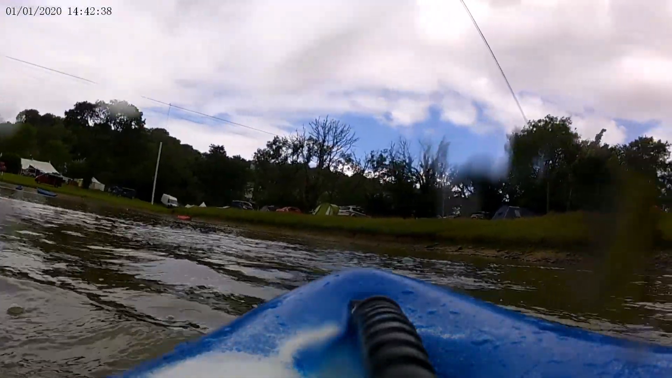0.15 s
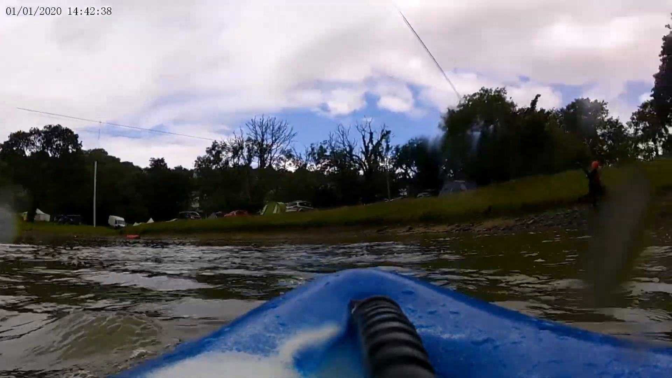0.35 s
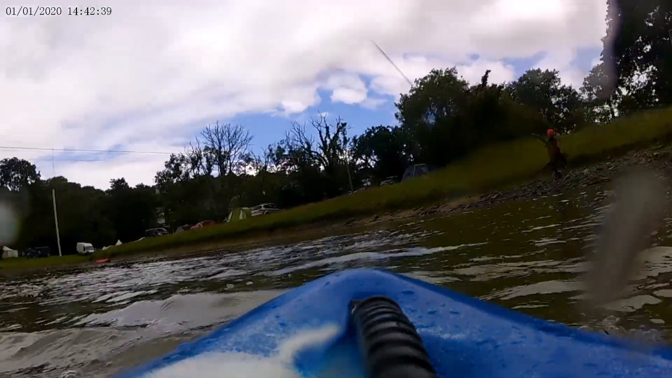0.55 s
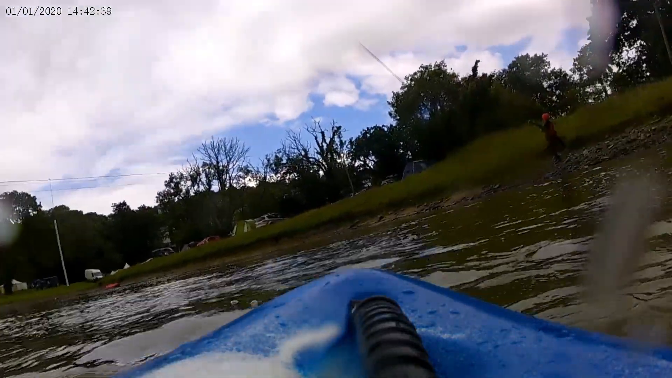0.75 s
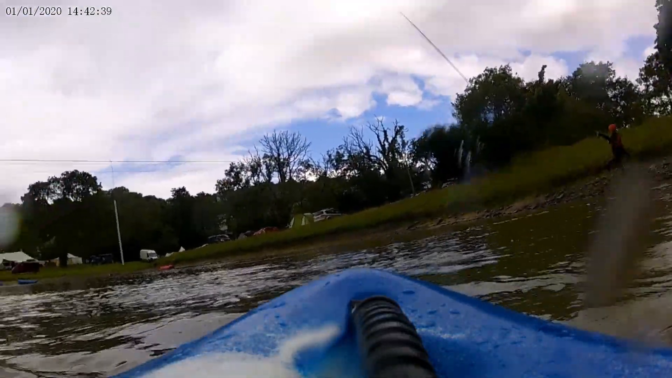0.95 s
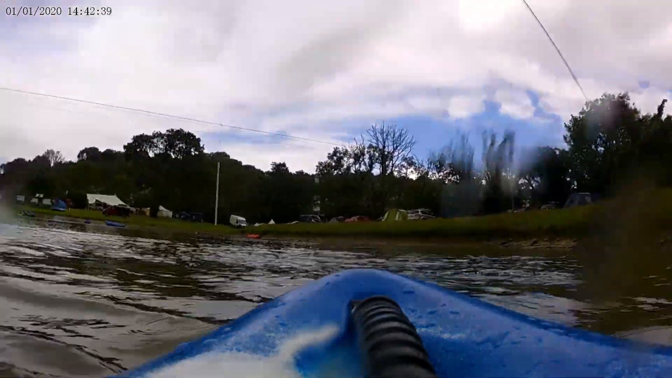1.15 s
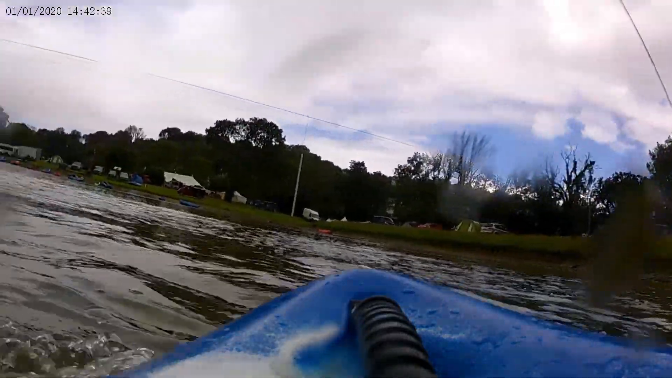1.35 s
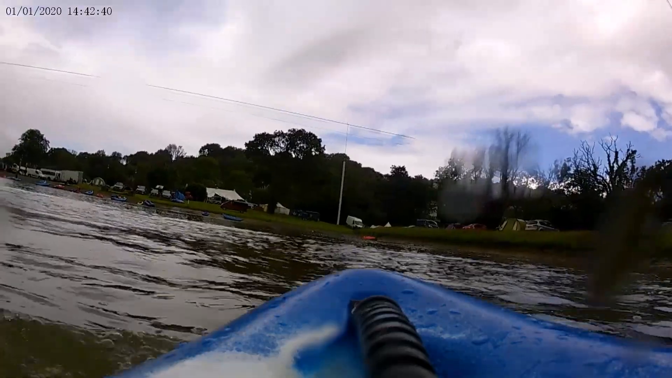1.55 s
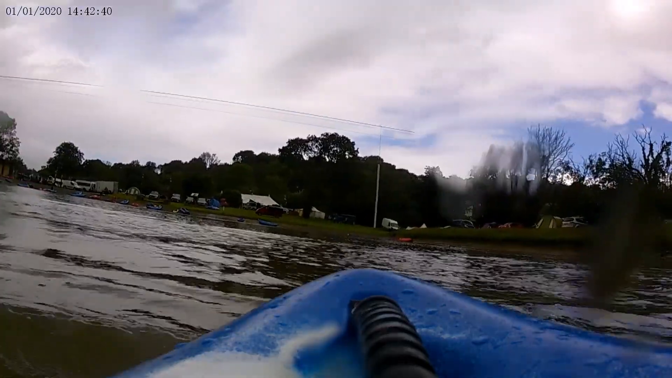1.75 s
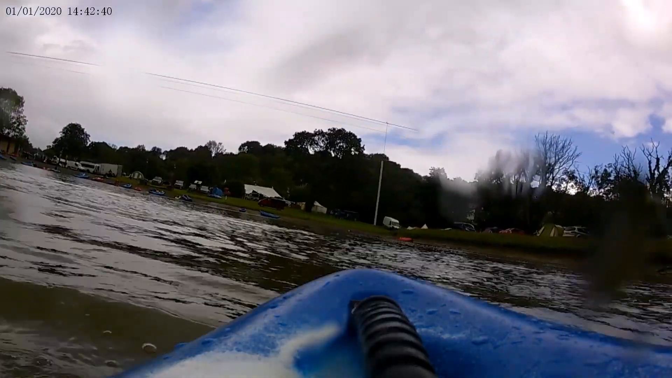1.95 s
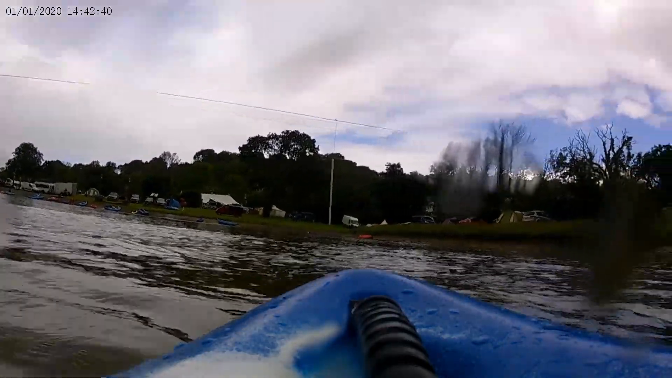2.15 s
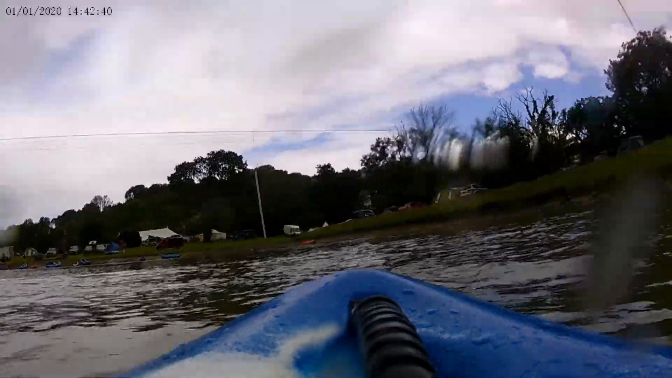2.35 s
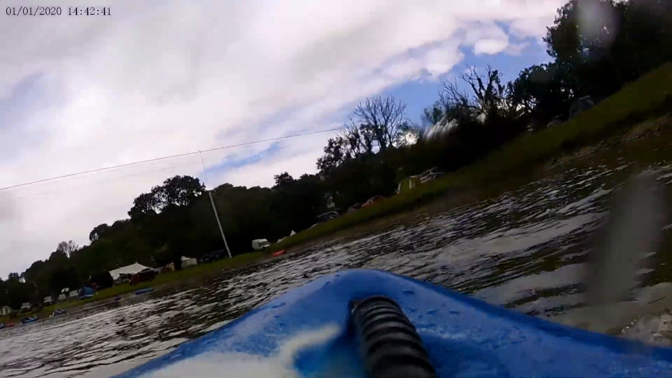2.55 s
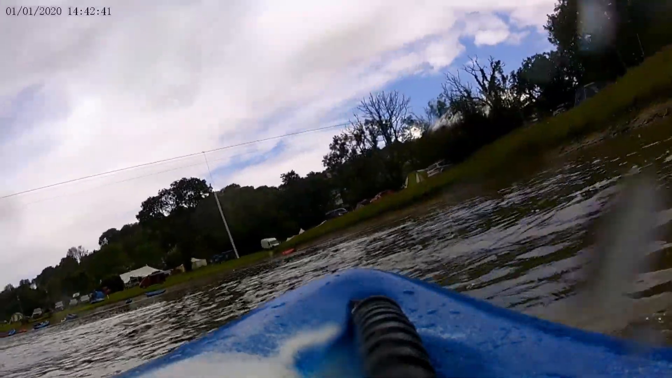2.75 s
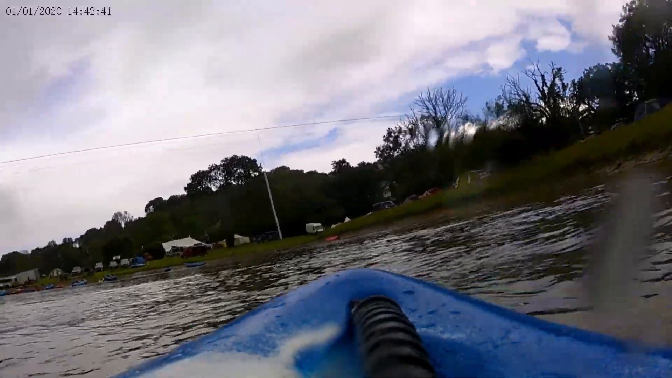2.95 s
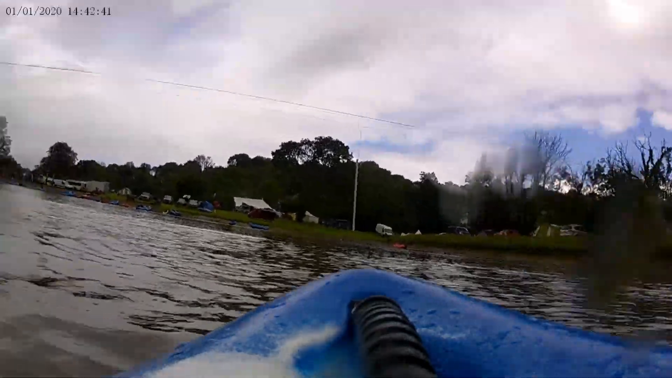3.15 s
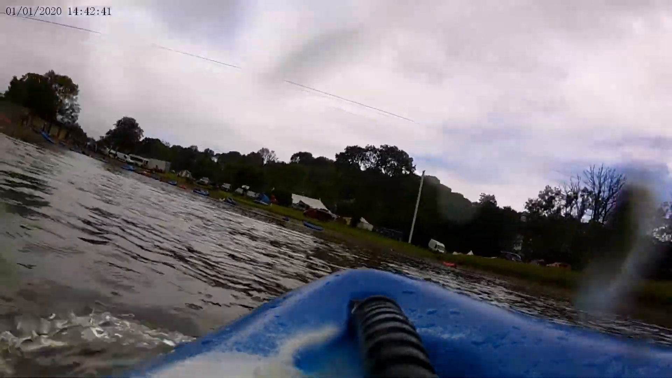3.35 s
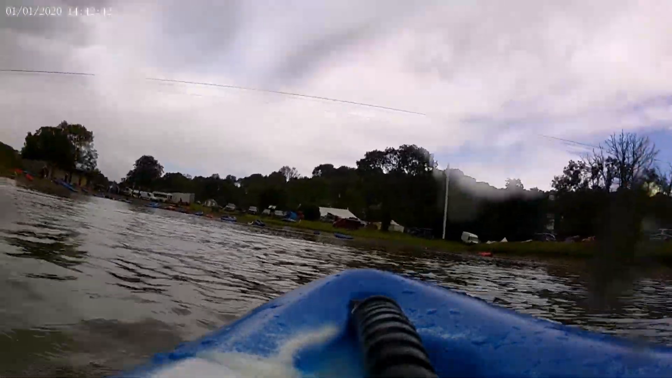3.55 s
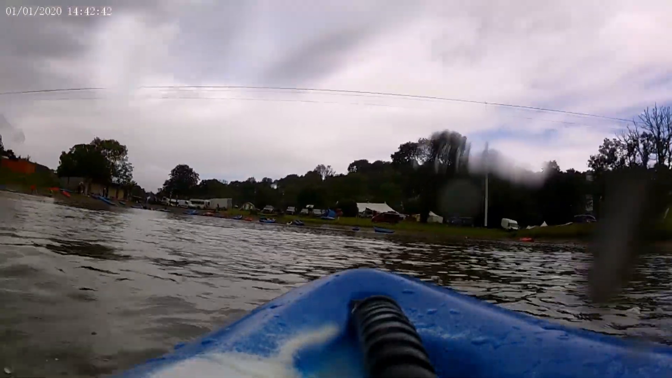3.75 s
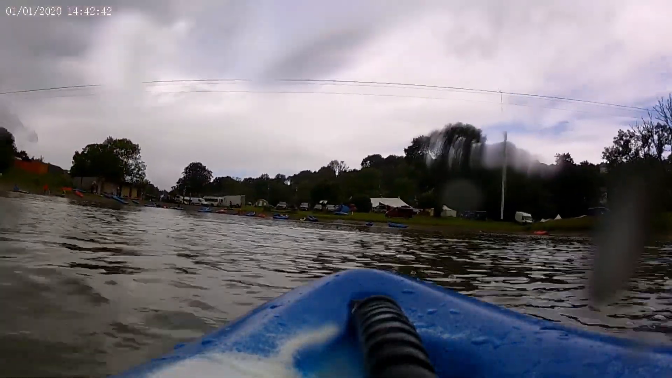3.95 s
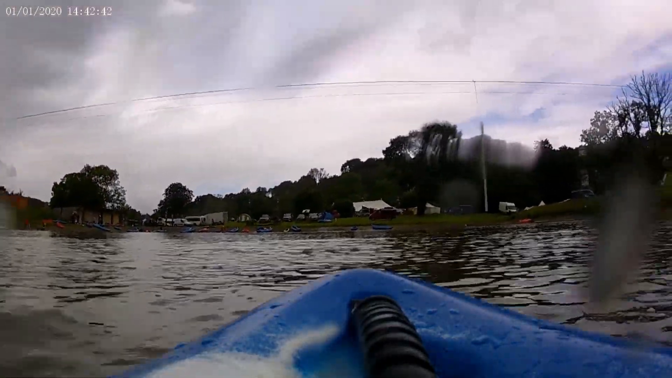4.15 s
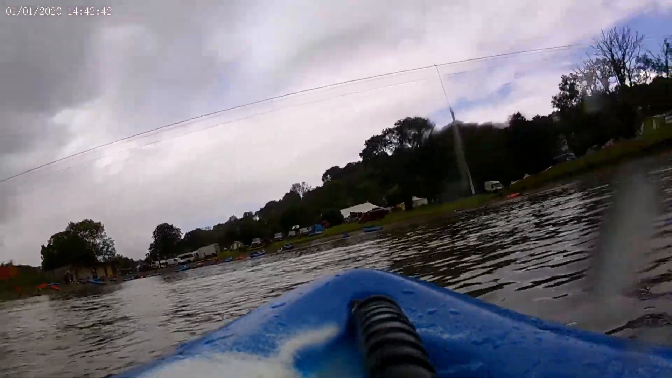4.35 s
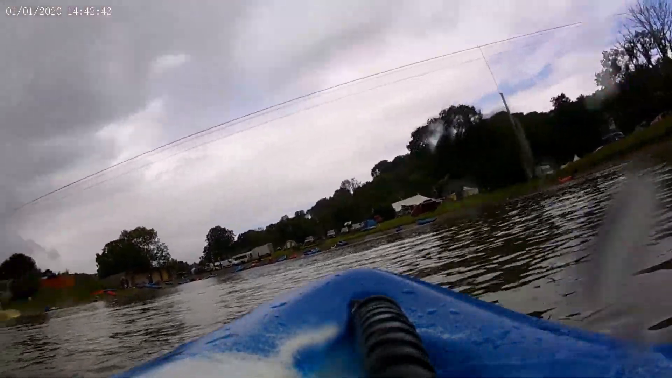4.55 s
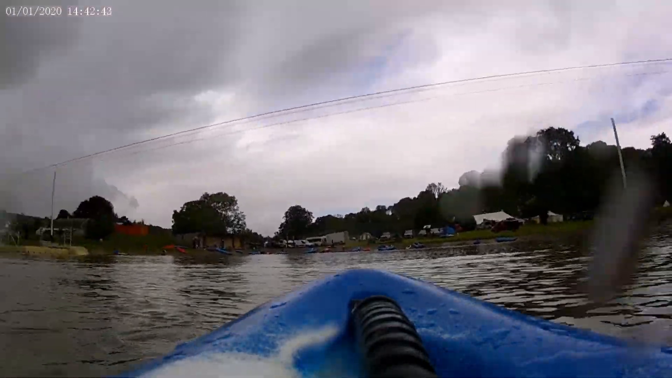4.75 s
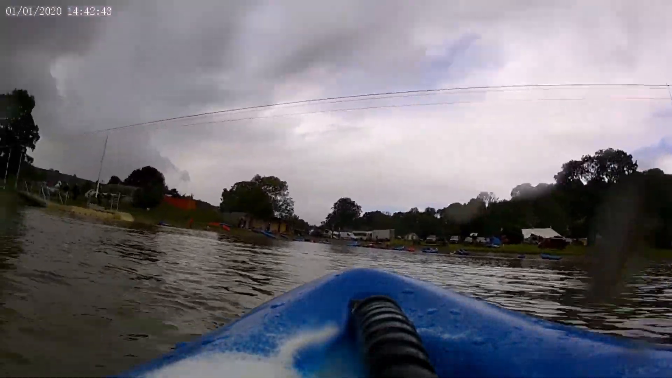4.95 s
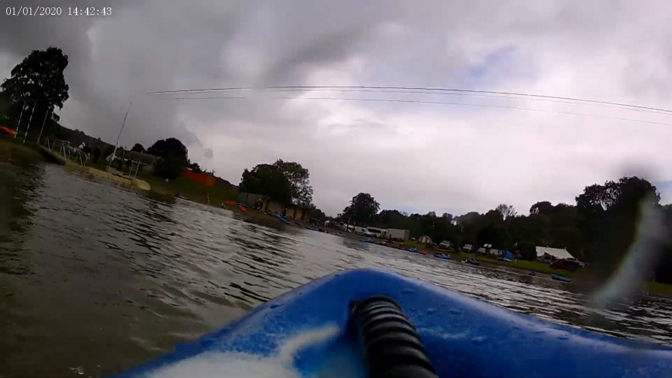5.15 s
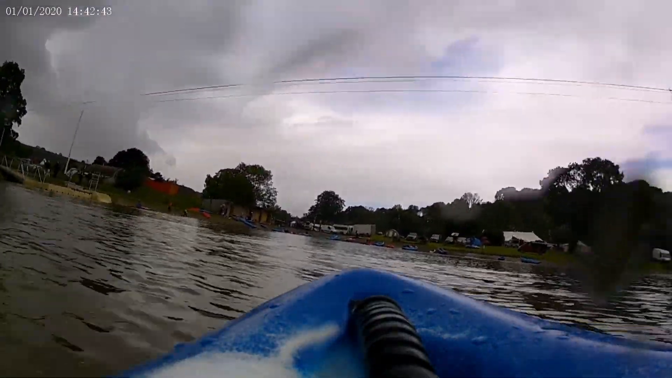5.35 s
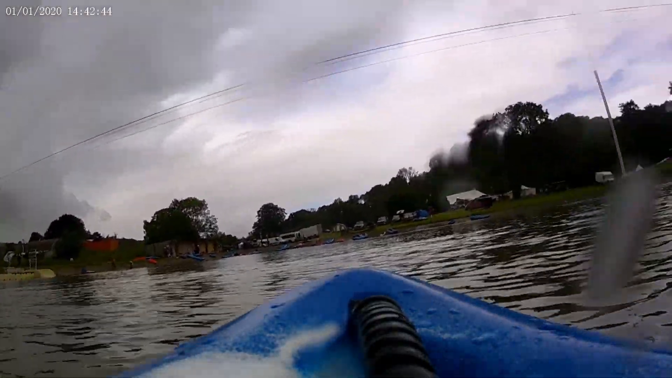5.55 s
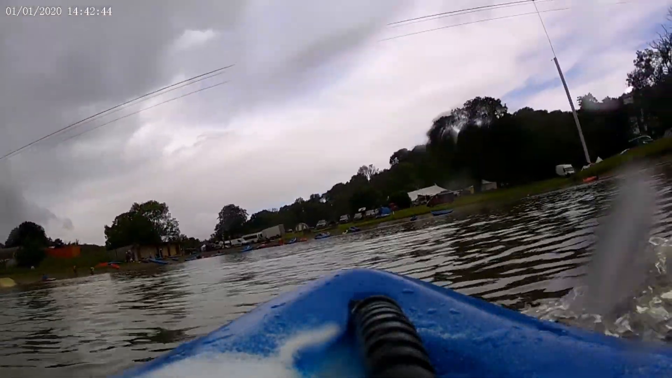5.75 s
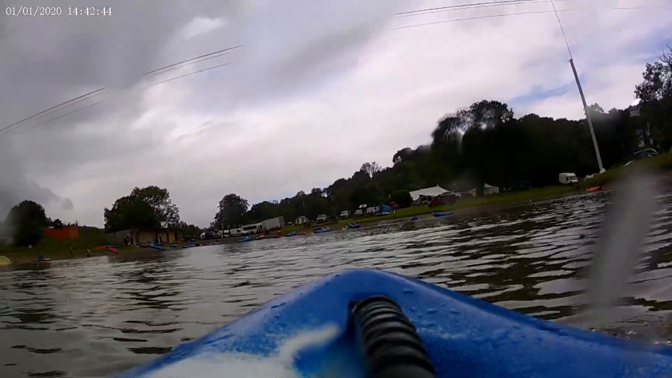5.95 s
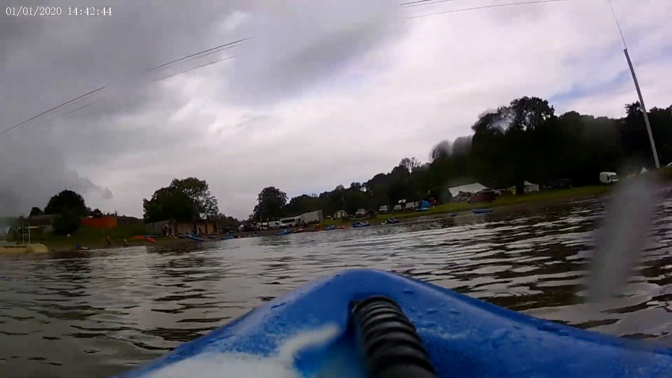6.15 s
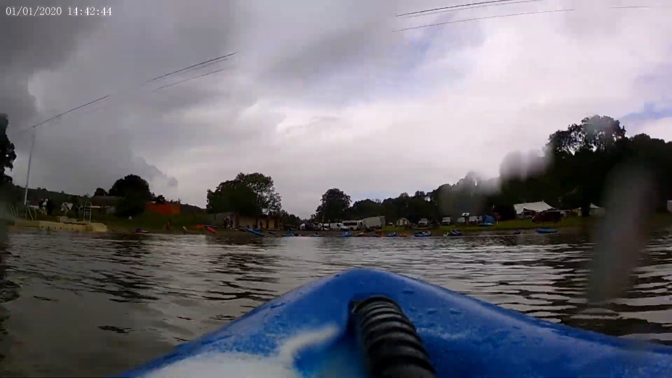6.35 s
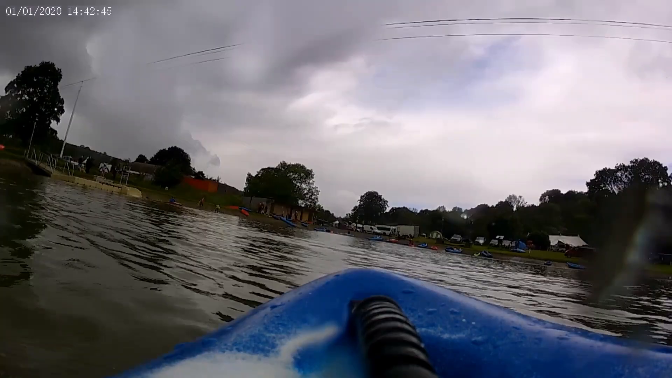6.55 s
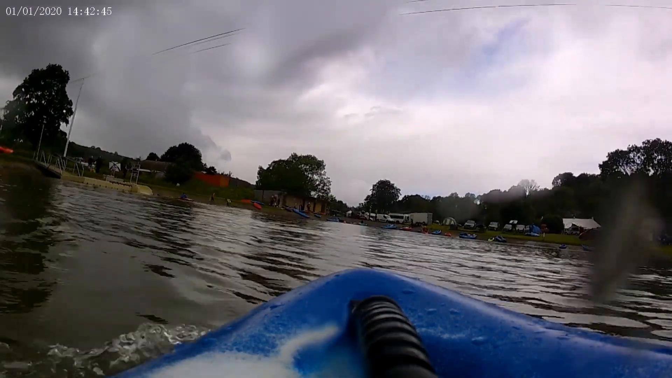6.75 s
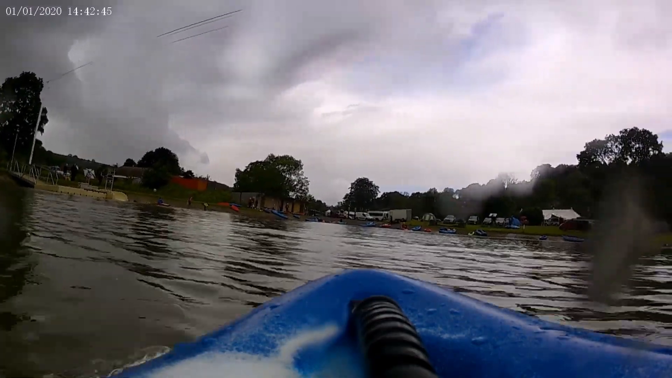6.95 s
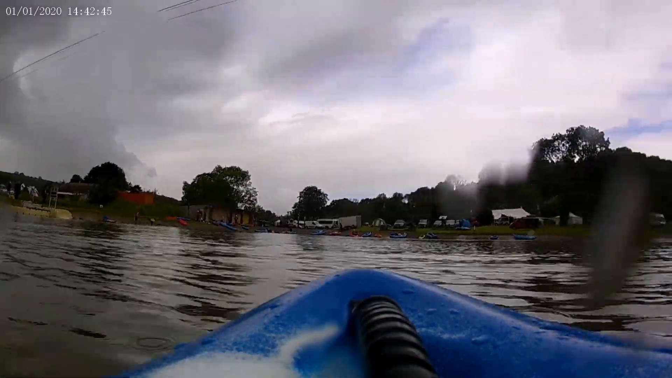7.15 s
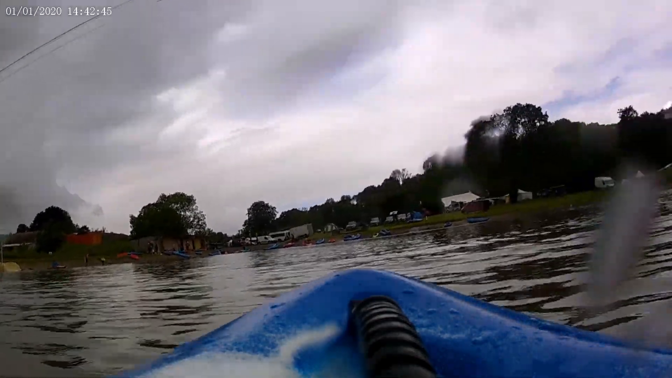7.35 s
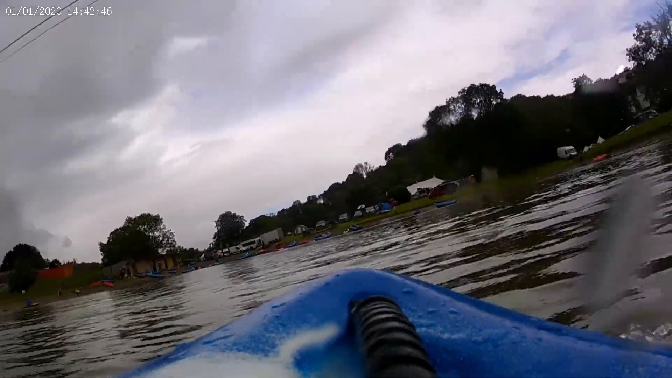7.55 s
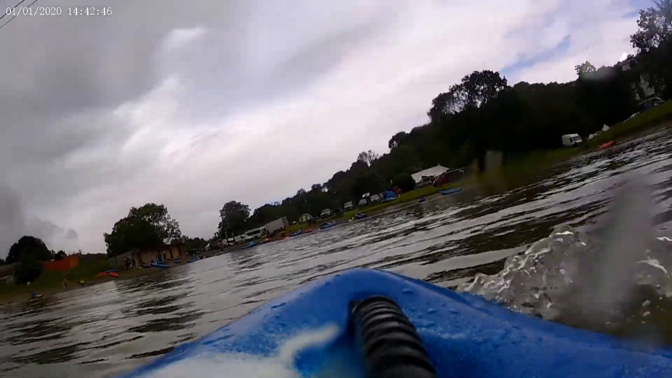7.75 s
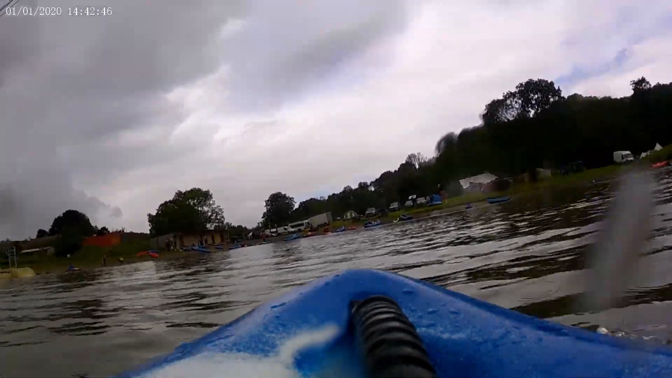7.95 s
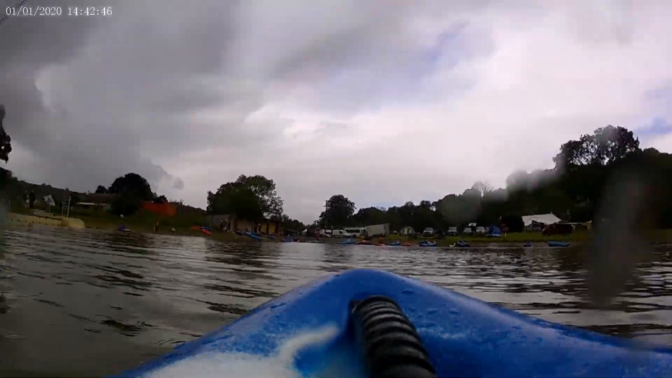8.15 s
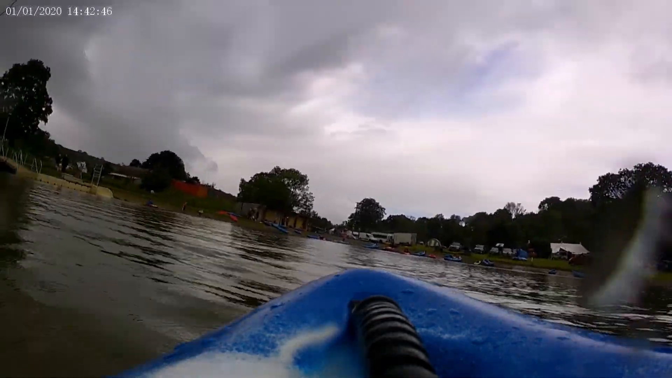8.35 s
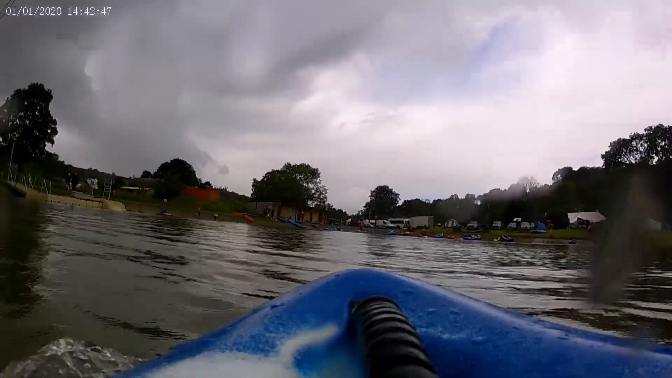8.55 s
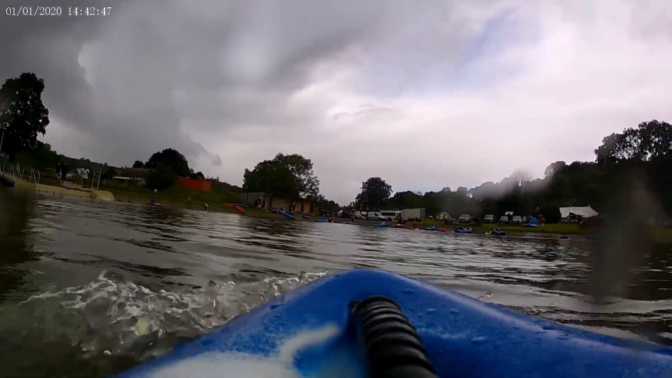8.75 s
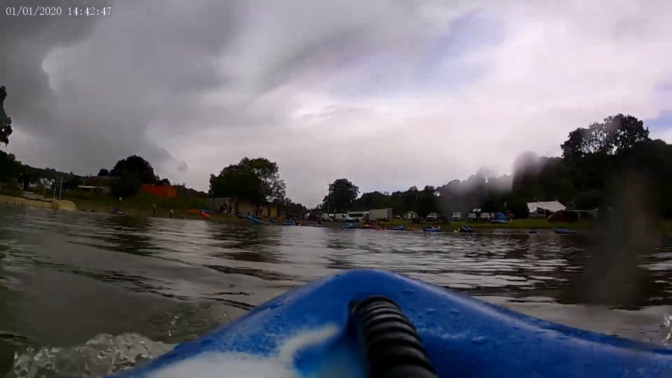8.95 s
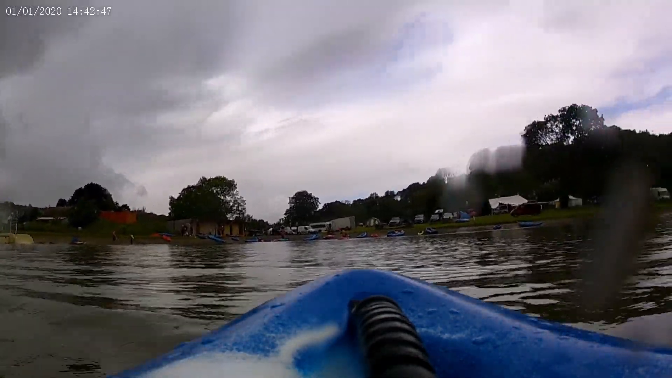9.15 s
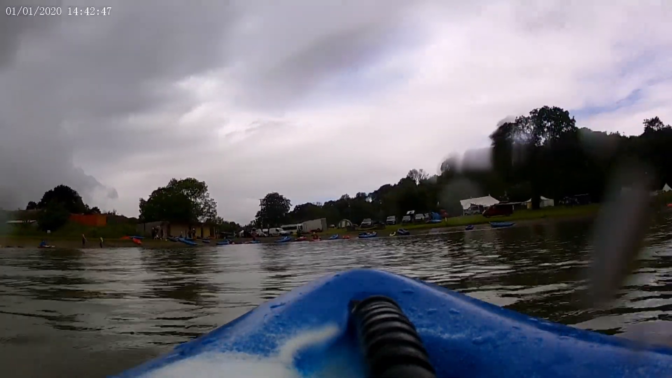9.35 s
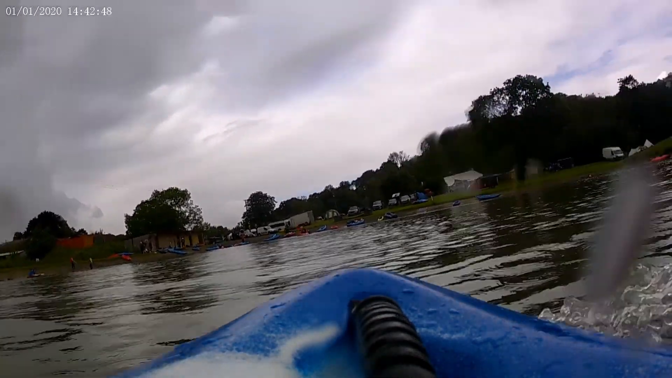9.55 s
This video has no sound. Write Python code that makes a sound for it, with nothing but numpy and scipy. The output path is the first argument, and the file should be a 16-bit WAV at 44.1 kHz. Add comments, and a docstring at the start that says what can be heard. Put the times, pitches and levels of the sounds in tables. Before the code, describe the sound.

Heard from a sealed case fixed to a plastic kayak's deck, water gurgles, sloshes and plops along the hull on open water. Small waves slap softly and drops tick. A hard paddle knock at about 3.5 seconds distorts and booms through the hollow hull. Later the gurgling grows in strong surges, with more knocks and brief wet scraping. Faint hiss stays underneath.

```python
"""A plastic kayak is paddled over a lake, heard from a sealed case fixed to its deck.
From the start, swarms of short bubble tones and wandering noise gurgle, slosh and spray along the hull.
Single bubbles plop, wavelets slap and fine drops tick: short dying tones, some with puffs of noise.
From 3.5 s the paddle knocks the rim: noise bursts ring the case and panels, overload the input, and the
hollow hull booms. The shaft drags in wet chatter at 6.6 s and 8.4 s. A faint hiss lies under it all."""
import sys
import numpy as np
from scipy import signal
from scipy.fft import rfft, irfft
from scipy.io import wavfile
from scipy.ndimage import uniform_filter1d

SR = 44100
rng = np.random.default_rng(int(sys.argv[2]) if len(sys.argv) > 2 else 0)


def dump_mix(stems):
    """Bounce the given channels to the path in sys.argv[1] as a 16-bit WAV at rate SR."""
    frames = np.atleast_2d(stems).T  # one column per channel
    limited = np.clip(frames, -1, 1)  # hard clip at full scale
    pcm = np.round(limited * 32767).astype(np.int16)
    wavfile.write(sys.argv[1], SR, pcm)


N = 423346
T = np.arange(N) / SR


def amp(db):
    """Turns decibels into a plain gain."""
    return 10 ** (np.asarray(db) / 20)


def evened(x):
    """Scales x to an average (RMS) level of 1."""
    return x / np.sqrt(np.mean(x ** 2) + 1e-20)


def add(mix, start_s, sound):
    """Adds a sound to the mix in place, cut off at the end."""
    part = mix[round(start_s * SR):][:len(sound)]
    part += sound[:len(part)]


def lowpass(x, order, cutoff_hz):
    """Dulls x above the cutoff."""
    return signal.lfilter(*signal.butter(order, cutoff_hz, fs=SR), x)


def bandpass(x, order, low_hz, high_hz):
    """Keeps the pitches between two limits."""
    return signal.sosfilt(signal.butter(order, [low_hz, high_hz], "band", fs=SR, output="sos"), x)


def shaped(x, spectrum):
    """Colours x by a table of pitches and levels, then evens its level."""
    points_hz, points_db = np.transpose(spectrum)
    hz = np.fft.rfftfreq(N, 1 / SR)
    gain = amp(np.interp(np.log(hz + 1), np.log(points_hz + 1), points_db))
    return evened(irfft(rfft(x) * gain, N))


def resonate(x, hz, width_hz):
    """A resonance with a gain of about 1 at its centre; a narrower one rings longer."""
    pole = np.exp((2j * np.pi * hz - np.pi * width_hz) / SR)
    return 2 * signal.lfilter([1 - abs(pole)], [1, -pole], x).real


def decay(t, t60, rise):
    """A soft start, then a fall of 60 dB in t60 seconds."""
    return amp(-60 * t / t60) * (1 - np.exp(-t / rise))


def ring(hz, t60, rise=.002, glide=0., phase=0.):
    """A dying tone with a soft start whose pitch may climb as a bubble nears the surface."""
    t = np.arange(int(np.clip(t60, .005, 1) * SR)) / SR
    return np.sin(2 * np.pi * hz * t * (1 + glide * t / t60) + phase) * decay(t, t60, rise)


# Ring of the sealed case: pitch_hz, width_hz, level_db
CASE_RINGS = [(1060, 77, 4), (1560, 410, 0.5), (1760, 33, -37), (2070, 80, -20)]
CASE_LEAK_DB = -18.5  # what passes below and between the rings


def through_case(x):
    """The sealed case rings at its modes, lets a dull rest through and weakens the treble."""
    heard = amp(CASE_LEAK_DB) * lowpass(x, 2, 900)
    for hz, width_hz, db in CASE_RINGS:
        heard = heard + amp(db) * resonate(x, hz, width_hz)
    return lowpass(heard, 2, 2300)


def bubbles(lo_hz, hi_hz, per_s, cycles, spread_db, clump_db, count=16):
    """A swarm of short rising tones; they come in clumps of some 30 ms, a few are large."""
    wander = uniform_filter1d(uniform_filter1d(rng.standard_normal(N), 1100), 500)
    clumps = amp(clump_db * evened(wander))
    draw = rng.random(N)
    size = amp(spread_db * np.minimum(rng.exponential(1, N), 4)) * rng.choice([-1, 1], N)
    # the rare draws below count become bubbles, each of one of the pitches
    kind = np.floor(draw * SR / per_s * count)
    swarm = np.zeros(N)
    for k, hz in enumerate(np.geomspace(lo_hz, hi_hz, num=count)):
        bubble = ring(hz, cycles / hz, rise=1 / hz, glide=0.17)
        swarm += signal.oaconvolve(clumps * size * (kind == k), bubble)[:N]
    return evened(swarm)


def rush(patch_db, gust_db, bins=5, frames=20):
    """Noise whose level wanders in small patches of time and pitch, with brief surges over all pitches."""
    # a frame is a step of 1.5 ms, a bin a step of 172 Hz
    real, imaginary, patches = rng.standard_normal((N // 64 + 5, 129, 3)).T
    for _ in range(2):
        patches = uniform_filter1d(uniform_filter1d(patches, size=bins, axis=0), size=frames, axis=1)
    gusts = evened(uniform_filter1d(rng.standard_normal(real.shape[1]), size=frames))
    grid = (real + 1j * imaginary) * amp(patch_db * evened(patches) + gust_db * gusts)
    return evened(signal.istft(grid, nperseg=256, noverlap=192)[1][:N])


# Gurgle of the water on the hull: time_s, level_db
GURGLE = [(0, -40), (.35, -38.5), (.9, -41.5), (1.3, -38), (1.9, -40), (2.4, -36), (3.0, -38), (3.5, -38),
          (4.0, -38), (4.3, -38), (5.1, -33.5), (5.8, -35), (6.4, -38.5), (6.85, -39.5), (7.22, -28),
          (7.53, -33), (7.88, -26), (8.25, -35), (8.7, -36.5), (8.95, -29), (9.25, -34), (9.4, -31),
          (9.6, -39.5)]
# Surges as the blade or a wave throws water on the hull: middle_s, length_s, slosh_db, rumble_db, spray_db
SURGES = [(0.202, 0.23, -38, -60, -46.5), (1.74, 0.34, -35, -43, -76), (2.18, .3, -36.5, -37, -74),
          (3.607, 0.18, -27, -17, -65), (3.844, 0.21, -50, -37, -46.5), (5.05, 0.21, -32, -30, -52),
          (5.464, 0.52, -33, -40, -61), (6.326, .25, -55, -33, -55), (6.84, 0.66, -40, -36.5, -54),
          (8.01, 0.45, -39, -31.5, -61), (8.408, 0.29, -25, -42, -49), (8.915, 0.67, -28, -29, -51),
          (9.35, .2, -37, -34, -52)]
# Slosh, rumble and spray follow the gurgle: level_db at a gurgle of MEAN_DB, change in dB per dB of gurgle
MEAN_DB = -37
SLOSH_LAW, RUMBLE_LAW, SPRAY_LAW = (-43, 0.13), (-41, 0.37), (-58, 0.71)


def levels():
    """Gains of gurgle, slosh, rumble and spray: the laws, with the power of the surges swelling on top."""
    gurgle_db = np.interp(T, *np.transpose(GURGLE))
    powers = np.array([amp(db + slope * (gurgle_db - MEAN_DB)) ** 2
                       for db, slope in (SLOSH_LAW, RUMBLE_LAW, SPRAY_LAW)])
    for middle_s, length_s, *surge_dbs in SURGES:
        swell = np.hanning(round(length_s * SR)) ** 2
        for power, db in zip(powers, surge_dbs):
            add(power, middle_s - length_s / 2, amp(db) ** 2 * swell)
    return amp(gurgle_db), *np.sqrt(powers)


# Rush under the bubbles, before the case: pitch_hz, level_db (per Hz)
WASH = [(400, 13), (700, 2.5), (2000, 1), (3200, -16), (6000, -50)]
# Colour of the low slosh: pitch_hz, level_db (per Hz)
SLOSH = [(71, -15), (120, 2), (171, -9), (215, 0.5), (316, -3.5), (397, 0.5), (723, -9), (900, -42),
         (1170, 3), (1980, -120)]
# Colour of the spray: pitch_hz, level_db (per Hz)
SPRAY = [(2000, -16), (2600, -19), (3000, -16.5), (3350, 2.5), (3800, -7.5), (4280, 0), (4900, -5.5),
         (5600, -8.5), (7000, -18), (9000, -48)]
# Low modes of the hull kept astir by the swell: pitch_hz, width_hz, level_db (relative)
HULL_HUM = [(67.8, 18.4, 2), (92.4, 16, -11), (49.6, 3.7, -8)]


def water():
    """Four sizes of motion: gurgle rings the case, slosh the panels, swell the air in the hull; spray is on top."""
    gurgle_gain, slosh_gain, rumble_gain, spray_gain = levels()
    wash = shaped(rush(3.6, 2.74, bins=3, frames=16), WASH)
    gurgle = evened(through_case(bubbles(721.5, 2997, 350, 37.8, 2.95, 3.7) + 2.07 * wash))
    fine_rush = rush(4.8, 4.1, bins=5, frames=14)
    spray = shaped(bubbles(2650, 6300, 400, 41, 2.9, 6.0) + 2.05 * fine_rush, SPRAY)
    low_rush = rush(5.6, 3.0, bins=2, frames=24)
    slosh = shaped(bubbles(129.5, 756, 200, 7.1, 5.1, 6.2) + 4.27 * low_rush, SLOSH)
    noise, rumble = rng.standard_normal(N), np.zeros(N)
    for hz, width_hz, db in HULL_HUM:
        rumble += amp(db) * evened(resonate(resonate(noise, hz, width_hz), hz, 2 * width_hz))
    return gurgle_gain * gurgle + slosh_gain * slosh + rumble_gain * evened(rumble) + spray_gain * spray


# Paddle against the rim: start_s, crack_db, clack_db (deck), crack_t60_s, panel_db, boom_db, sway_db
# (levels are relative, each within its own layer)
KNOCKS = [(3.547, 12.5, 28, 0.049, 11, -0.5, 4), (5.9, 1.5, 15.5, 0.038, -2.5, -6.5, -4),
          (6.581, 21.5, 32, 0.031, 6, 0.5, -23), (6.636, 1.5, 13.5, 0.034, 5, -0.5, -15),
          (6.678, -23, -12, .06, -12, -16, -40), (8.376, -17, -3, 0.074, 0.5, 6.5, -3),
          (8.410, 5, 15, 0.046, 1, 3, -1), (8.434, -17, -14, 0.03, -8, -20, -30),
          (8.74, 10.5, 22.5, 0.032, 4, -5, -21), (8.782, -21, -4, 0.03, -5, -17, -5),
          (8.845, -30, -15, .027, -9, -5.5, -12), (9.4925, 19.5, 17, 0.022, -7, 3.5, -5)]
# Ringing panels of the hull: pitch_hz (before a random shift), level_db (relative), t60_s
PANELS = [(105.4, 0, 0.12), (145.1, -4.5, 0.15), (187.1, -6, 0.12), (250, 0, 0.1), (305.5, 0.5, 0.08),
          (390, -2, 0.087), (508, -8.5, 0.054), (720, -15, 0.043)]
# air and whole-body modes of the hull: pitch in Hz, t60 in s
BOOM_HZ, BOOM_T60, SWAY_HZ, SWAY_T60 = 69.54, 0.39, 47.7, 0.29


def knocks():
    """A rattling crack in the case, then the panels, then the long boom of the hull."""
    cracks, blows, panels, boom = np.zeros((4, N))
    t = np.arange(6000) / SR
    for start_s, crack_db, clack_db, crack_t60, panel_db, boom_db, sway_db in KNOCKS:
        burst = decay(t, crack_t60, 0.00089) * rng.standard_normal(len(t))
        add(cracks, start_s, amp(crack_db) * burst)
        add(blows, start_s, amp(clack_db) * burst)
        for hz, db, t60 in PANELS:  # every blow lands elsewhere: other phases, slightly other pitch
            tone = ring(hz * rng.uniform(0.92, 1.04), t60, 0.0039, phase=rng.uniform(0, 2 * np.pi))
            add(panels, start_s, amp(panel_db + db) * tone)
        # a hard blow (crack of 0 dB or more) stops the old boom and starts it afresh
        boom[round(start_s * SR):] *= crack_db < 0
        add(boom, start_s, amp(boom_db) * ring(BOOM_HZ, BOOM_T60, 0.0063))
        add(boom, start_s, amp(sway_db) * ring(SWAY_HZ, SWAY_T60, 0.015))
    rattle = bandpass(cracks, 2, 3000, 6500)  # loose fittings buzz along
    clack = bandpass(blows, 2, 350, 900)  # the deck plate takes the blow
    return panels + boom + 4.1 * through_case(cracks) + 0.25 * rattle + clack


# Bubbles and drips that stand out: start_s, level_db (relative), pitch_hz (at the start)
PLOPS = [(0.022, -21.5, 1546), (.218, -19, 1680), (0.264, -22, 994), (.417, -26, 1120), (.677, -23, 1020),
         (.688, -25, 1570), (.841, -21, 1630), (1.098, -25, 1710), (1.368, -24, 1070), (1.702, -30, 1033),
         (2.011, -19.5, 1250), (2.126, -22.5, 1046), (2.184, -24, 1010), (2.488, -21, 1020),
         (2.543, -21, 2050), (2.568, -15.5, 1030), (2.645, -24.5, 1110), (2.859, -21.5, 927),
         (3.099, -24.5, 970), (3.216, -19, 1820), (3.358, -23, 1060), (3.465, -7, 1060), (3.634, -16, 1144),
         (3.842, -15, 1790), (4.021, -24, 1560), (4.065, -24.5, 1066), (4.302, -25.5, 1070),
         (4.402, -23.5, 1530), (4.607, -20.5, 1460), (5.274, -23, 939), (5.394, -11.5, 939),
         (5.401, -8, 1088), (5.461, -16.5, 1100), (5.471, -20, 1710), (5.495, -18.5, 1060),
         (5.816, -19.5, 1070), (6.188, -20, 1006), (6.253, -16.5, 1730), (6.287, -20, 1790),
         (6.375, -23.5, 1120), (6.509, -23.5, 945), (6.602, -5, 1060), (6.706, -18, 1460),
         (7.073, -16, 1780), (7.114, -19.5, 1095), (7.139, -22, 1090), (7.241, -16.5, 966),
         (7.341, -14.5, 1120), (7.374, -16.5, 1680), (7.471, -22, 1590), (7.539, -20.5, 1096),
         (7.578, -16, 1680), (7.762, -23, 1580), (7.843, -15.5, 1050), (7.858, -11, 1804),
         (7.884, -18, 1080), (7.919, -9.5, 960), (7.998, -18, 1060), (8.324, -15, 1070), (8.363, -21, 980),
         (8.481, -12.5, 1600), (8.87, -19.5, 1046), (9.054, -10.5, 1024), (9.085, -17.5, 1510),
         (9.221, -21, 1036)]
PLOP_T60, PLOP_REF_HZ, PLOP_SHORTEN = 0.041, 1050, 0.51  # t60 in s at the reference pitch; higher die sooner
SMALL_PLOPS, SMALL_PLOP_DB = 30, 10  # number of fainter ones, and their highest level over the gurgle


def small_plops():
    """Random rows like those of PLOPS, pitched below the two lowest rings of the case."""
    when, size, mode, detune = rng.random((SMALL_PLOPS, 4)).T
    start_s = when * T[-1]
    hz = np.where(mode < .7, CASE_RINGS[0][0], CASE_RINGS[1][0]) * (0.73 + 0.127 * detune)
    level_db = np.interp(start_s, *np.transpose(GURGLE)) + SMALL_PLOP_DB - 5.1 * size
    return list(zip(start_s, level_db, hz))


def plops():
    """Each large bubble sings briefly, roughly, and shakes the case."""
    tones, shakes = np.zeros((2, N))
    t = np.arange(1500) / SR
    for start_s, db, hz in PLOPS + small_plops():
        t60 = PLOP_T60 * (hz / PLOP_REF_HZ) ** -PLOP_SHORTEN
        puff = rng.standard_normal(len(t)) * amp(-60 * t / t60) * (1 - np.exp(-t / 0.0029)) ** 2
        rough = resonate(resonate(puff, hz, 760), hz, 1020)
        add(tones, start_s, amp(db) * ring(hz, t60, rise=0.001, glide=0.11))
        add(tones, start_s, 3.04 * amp(db) * rough)
        add(shakes, start_s, amp(db) * puff)
    return 1.315 * lowpass(tones, 3, 2800) + 1.61 * through_case(shakes)


# Wavelets slapping the hull: start_s, level_db (relative), pitch_hz (at the start), thump_db (relative)
SLAPS = [(0.08, -20.5, 213, -40), (0.185, -25, 234, -24), (0.673, -24, 250, -41), (0.838, -24.5, 415, -38),
         (1.263, -21, 227, -30), (1.658, -22, 204, -40), (1.696, -18.5, 520, -33), (1.839, -34, 164, -20),
         (1.484, -27, 360, -42), (2.138, -16, 214, -21), (2.356, -31, 197, -34), (2.64, -23, 400, -37),
         (2.836, -26.5, 382, -50), (3.215, -29, 253, -28), (3.359, -20.5, 592, -48), (3.466, -20, 390, -28),
         (3.713, -31, 526, -26), (4.396, -26, 410, -43), (4.957, -24.5, 199, -29), (5.029, -28, 270, -35),
         (5.392, -29, 464, -41), (5.46, -26.5, 555, -32), (6.867, -21.5, 352, -40), (7.06, -21, 367, -37),
         (7.113, -26, 503, -25), (7.299, -28, 428, -24), (7.485, -22, 360, -34), (7.62, -28, 495, -29),
         (7.732, -18.5, 482, -34), (7.919, -10.5, 532, -20.5), (7.987, -20, 165, -24),
         (8.09, -22, 378, -38), (8.347, -20, 125, -27), (8.55, -17, 359, -33), (8.966, -16.5, 294, -38),
         (9.053, -20, 294, -34), (9.087, -17.5, 283, -25), (9.345, -27, 263, -25.5)]
SLAP_T60 = 0.056  # s
THUMP_HZ = 76.7  # before a random shift


def slaps():
    """A wavelet hits: one panel answers for a few cycles and the hull gives a soft thump."""
    out = np.zeros(N)
    for start_s, db, hz, thump_db in SLAPS:
        add(out, start_s, 1.32 * amp(db) * ring(hz, SLAP_T60, rise=0.96 / hz, glide=0.038))
        thump = ring(THUMP_HZ * rng.uniform(0.78, 1.34), 0.16, rise=0.013)
        add(out, start_s, 1.9 * amp(thump_db) * thump)
    return out


# The shaft drags over the wet rim after a knock: start_s, end_s, level_db (relative)
DRAGS = [(6.64, 6.719, -34.5), (8.42, 8.492, -42.5)]


def drags():
    """Dense wet chatter that stops when the shaft lifts off."""
    gate = np.zeros(N)
    for start_s, end_s, db in DRAGS:
        gate += amp(db) * np.interp(T, [start_s, start_s + .006, end_s - .01, end_s], [0, 1, 1, 0])
    chatter = rush(4.5, 2.5, bins=3, frames=3)
    return gate * (shaped(chatter, SPRAY) + 3.0 * evened(through_case(chatter)))


# Fine drops flicked on the deck: start_s, level_db (relative), pitch_hz
TICKS = [(0.151, -38, 3500), (0.2186, -28, 3370), (.4618, -41, 5110), (.9882, -39, 5030), (.997, -39, 4120),
         (1.099, -36, 3370), (1.57, -30.5, 4300), (2.8374, -36, 4280), (3.2162, -19.5, 4180),
         (3.464, -26.5, 4280), (3.7963, -33, 4300), (3.816, -33, 4100), (3.839, -39, 3250),
         (3.874, -29, 3300), (3.8975, -34, 5300), (4.3027, -30, 4300), (4.9521, -37, 4470),
         (5.1682, -36, 3340), (5.2785, -31.5, 4370), (5.3817, -30, 3290), (5.3967, -25, 3400),
         (5.4276, -33.5, 3250), (6.097, -35.5, 3300), (6.693, -22, 4160), (7.2062, -35, 4370),
         (7.6467, -24, 4060), (7.678, -36, 3370), (7.713, -34, 3280), (7.909, -39, 3650),
         (8.4642, -28, 4280), (9.41, -33.5, 4030)]


def ticks():
    """A drop gives a short ping inside a spit of treble noise."""
    pings, spit = np.zeros((2, N))
    t = np.arange(700) / SR
    for start_s, db, hz in TICKS:
        add(pings, start_s, 1.87 * amp(db) * ring(hz, 0.012, rise=0.00044))
        add(spit, start_s, amp(db) * decay(t, 0.012, 0.0007) * rng.standard_normal(len(t)))
    return pings + 1.03 * bandpass(spit, 3, 3000, 6200)


def scene():
    """All sounds of the kayak added up, as one channel."""
    return (water() + knocks() + plops() + slaps() + drags() + ticks())[None]


# Colour of the preamplifier hiss: pitch_hz, level_db (per Hz, relative)
HISS = [(30, 23.5), (2900, -2.5), (5000, 1.5), (12000, 3), (15600, 3.5), (15900, -44)]
HISS_DB = -54.5  # average level before the band limit
CEILING = 0.68  # where the input stage overloads, as a share of full scale
EDGE_HZ = 16500  # upper band limit


def record(dry):
    """Loud peaks are cut flat at the ceiling, the preamplifier hiss joins, then the band is limited."""
    hiss = amp(HISS_DB) * shaped(rng.standard_normal(N), HISS)
    clipped = np.clip(dry, -CEILING, CEILING) + hiss
    band_limit = signal.firwin(511, EDGE_HZ, window=("kaiser", 9), fs=SR)
    return signal.oaconvolve(clipped, band_limit[None], "same")


dry = scene()
out = record(dry)
dump_mix(out)
```